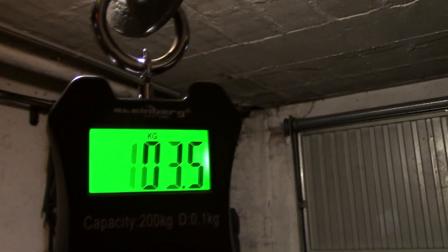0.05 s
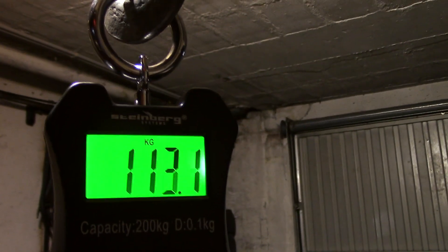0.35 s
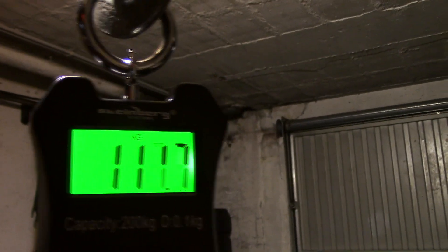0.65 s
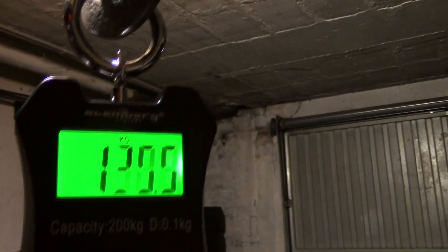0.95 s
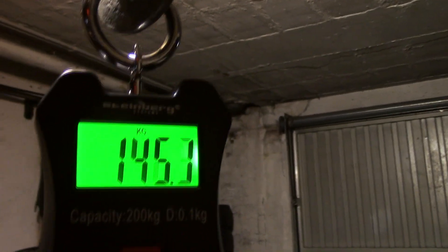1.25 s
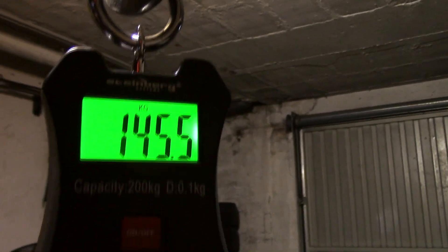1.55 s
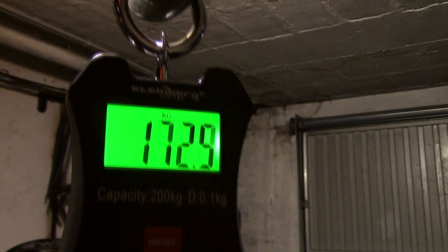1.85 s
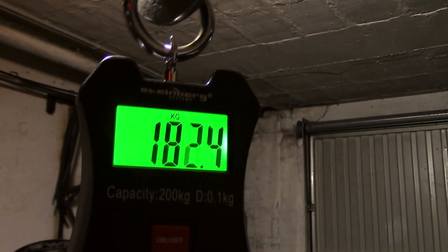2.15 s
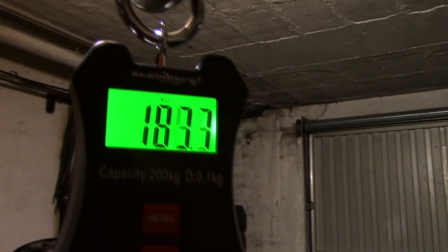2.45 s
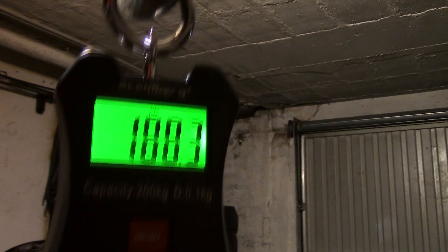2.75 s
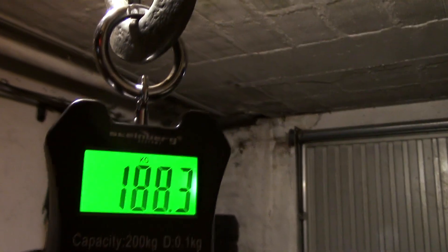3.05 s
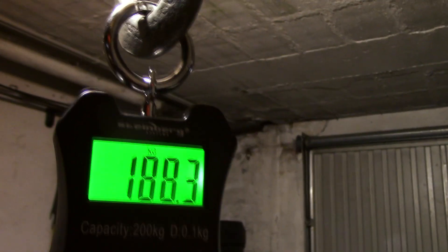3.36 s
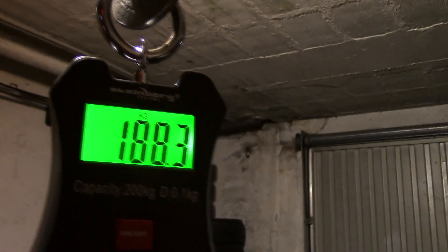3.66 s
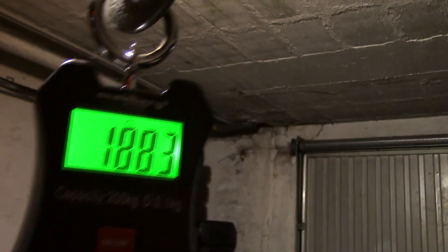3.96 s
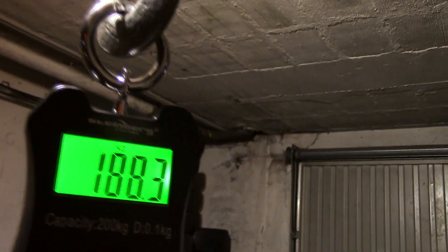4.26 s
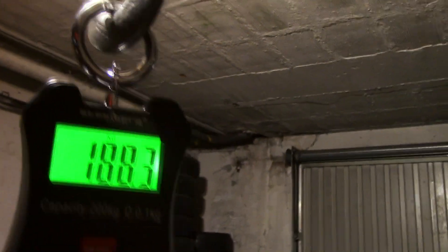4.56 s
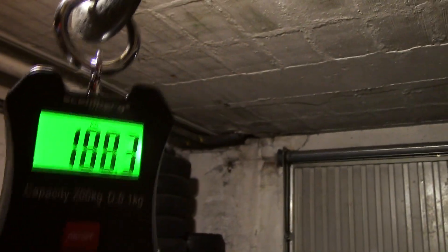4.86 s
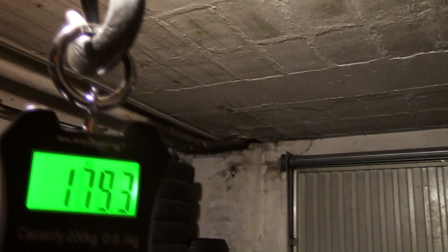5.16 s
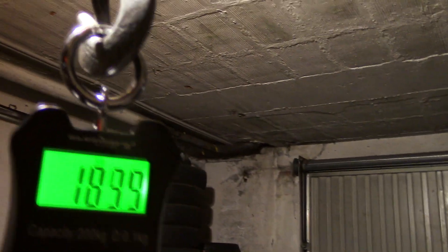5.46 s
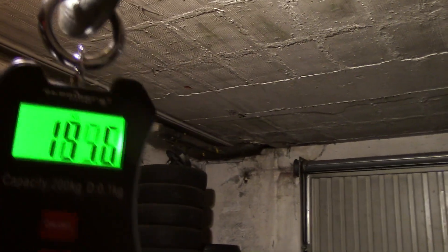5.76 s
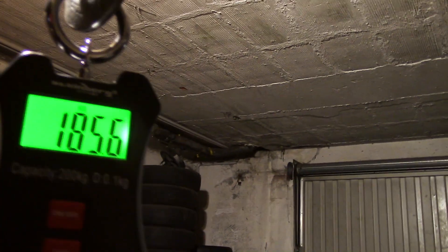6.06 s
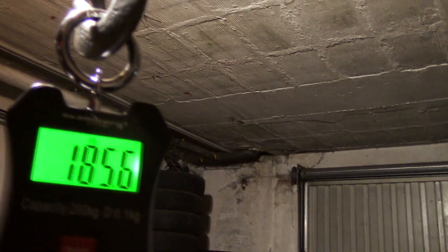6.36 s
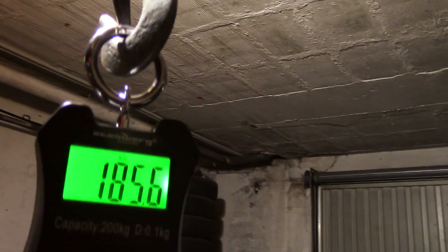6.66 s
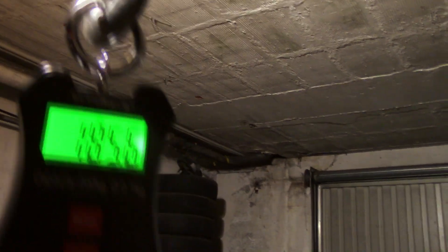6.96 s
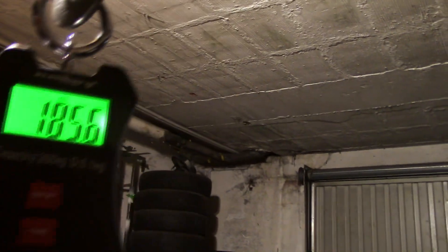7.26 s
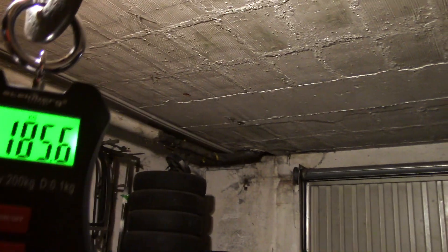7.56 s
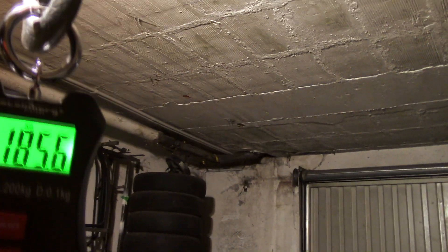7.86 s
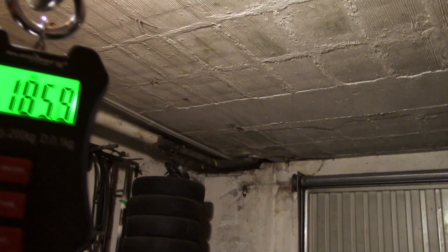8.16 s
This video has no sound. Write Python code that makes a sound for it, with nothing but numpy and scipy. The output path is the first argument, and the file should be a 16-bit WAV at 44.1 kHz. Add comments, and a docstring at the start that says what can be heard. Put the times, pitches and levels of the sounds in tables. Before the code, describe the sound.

A hand-pumped steel hoist is worked across a bare concrete garage, each hit leaving a short echo over quiet room air. The lever snaps through its slack and lands in a ringing, mid-pitched clunk at about 0.6, 1.4, 2.3, 3.4, 4.5, 5.5, 6.8 and 7.8 seconds. Roughly half a second before each clunk, it swings back with a softer click and a brief pivot rattle. Small steel parts chink and loose links clink lightly in between. At 1.9 seconds the whole frame jolts with one heavy clang, among the loudest hits. The strokes at 5.5 and 6.8 seconds rebound into a quick, duller second clunk. A few dry knocks and ticks sound right beside the microphone, faint at first and clearest around 5.4 and 7 seconds. The pumping keeps its pace to the end, at about 8 seconds.

```python
"""Engine hoist in a concrete garage

A hand-pumped hoist lifts an engine across a bare room from the microphone, about a stroke a second.
The lever clicks in its pivot, small steel parts chink, and each stroke ends in a ringing clunk;
once the whole frame jolts. Each blow is a dense clash dying with the room, plus a few ringing modes.
A few dry knocks and ticks sound right beside the microphone, over quiet garage air."""
import sys
import numpy as np
from scipy import signal
from scipy.fft import rfft, irfft, next_fast_len
from scipy.io import wavfile

SR = 44100
rng = np.random.default_rng(int(sys.argv[2]) if len(sys.argv) > 2 else 0)


def output_pcm(signal):
    """Save a mono or channel-first signal as 16-bit PCM at the path in sys.argv[1].

    Samples are clipped to [-1, 1] before scaling.
    """
    pcm = np.clip(np.atleast_2d(signal).T, -1, 1) * 32767
    wavfile.write(sys.argv[1], SR, np.round(pcm).astype(np.int16))


N = 362061
SIZE, LEAD_S = 2 ** 15, .03  # samples in one blow; time ahead of its contact
TOP_HZ = 15700

# reverberation of the garage: pitch_hz, t60_s
GARAGE_DECAY = [(100, 0.57), (170, 1.0), (300, 0.75), (700, 0.6), (1800, 0.59), (4800, 0.5), (8000, 0.39),
                (14000, 0.46)]
# standing waves between hoist and microphone: centre_hz, width_hz, gain_db
STANDING_WAVES = [(178.6, 7.4, 5), (226.4, 16, -9), (242.5, 5.4, 7.5), (318, 11.3, -6), (372, 12, -4),
                  (522, 34, -7), (856, 12.4, -17), (870, 23, 4), (994, 75, -4), (1481, 10, -22.5),
                  (1960, 79, -1.5), (2070, 43, 0.5), (2297, 10, -2), (2770, 10, 0), (3140, 17, -5.5)]
# spectra of the room air and of each kind of contact: pitch_hz, relative_db
AIR_COLOUR = [(12, -25.5), (20, -13.5), (92, -10.5), (225, 0), (306, 2.5), (404, 1), (686, -1), (767, -7),
              (906, -7.5), (1130, -1), (1340, -9.5), (1670, -12.5), (1870, -9.5), (6020, -22.5),
              (15500, -37.5)]
FRAME_COLOUR = [(40, -40), (110, -53), (170, -15), (215, -32), (370, 3.5), (520, -9.5), (1000, 6.5),
                (1600, -4), (2200, 0.5), (3000, -12), (4000, -21.5), (6000, -35), (11000, -48),
                (15500, -67)]
KNOCK_COLOUR = [(80, -5.5), (250, -1), (480, 6), (800, 5.5), (1300, -10), (2400, -8), (3500, -26.5),
                (8000, -63)]
TICK_COLOUR = [(100, -21), (400, 6.5), (900, -18), (1500, 1), (2200, -12), (2700, -18), (3900, -15),
               (5000, -58), (12000, -60)]
LINK_COLOUR = [(80, -49), (250, 5), (1000, 5.5), (2200, 9.5), (3800, 2), (4500, -7), (5200, -3.5),
               (6200, -19), (7000, -11.5), (8000, -36), (9600, -24), (11000, -32), (15000, -65)]
SETTLE_COLOUR = [(80, -34.5), (170, -2), (700, 8), (2000, 8.5), (3500, 2), (5500, -8), (7400, -11.5),
                 (8300, -21.5), (11000, -30), (15000, -45)]
SLIP_COLOUR = [(200, -36), (2500, 17), (5000, 7.5), (7000, 6), (8200, -0.5), (11000, -2), (13000, -18),
               (15500, -20)]
PIVOT_COLOUR = [(60, -28), (130, -31.5), (180, -8.5), (260, 3), (400, 3.5), (520, 7), (750, 4.5),
                (1400, 0.5), (2400, 3), (4200, -8), (6300, -24), (8000, -37.5), (10000, -35.5),
                (15000, -73.5)]
LEVER_COLOUR = [(50, -55.5), (120, -61), (170, -11.5), (215, -14), (260, -1), (540, 2.5), (720, 7),
                (950, 6), (1300, 9), (2400, 1), (3400, -10), (6000, -28.5), (11000, -54.5), (15500, -66.5)]
# ringing modes of the steel parts: pitch_hz, relative_db, t60_s
OPENING_RING = [(764, -52.5, 2.5), (1580, -62, 0.83), (386, -56.5, 0.95)]  # still sounding from an earlier stroke
FRAME_RING = [(173, -14.5, 0.25), (245, -12, 0.61), (311, -7.5, 0.75), (386, 2, 0.29), (478, -10, 0.82),
              (640, -32, 0.86), (736, -16, .6), (931, 1.5, 0.46), (1060, -11, 0.3), (1083, 0.5, 0.22),
              (1233, 1.5, 0.47), (1450, -6.5, 0.56), (1763, -36, 0.15), (1980, -19, 0.22),
              (2040, -14, 0.62), (2130, -10, 0.56), (2140, -5, .49), (2270, -10, 0.33), (2600, -40, .35),
              (2970, -15, .41), (3880, -21, 0.55)]
LINK_RING = [(826, -26, 1), (1160, 3.5, 0.39), (1740, -21, .6), (2160, -33, .5), (2180, 1.5, 0.79),
             (2310, 3.5, 0.6), (2500, -5, 0.29), (3080, 0, 0.43), (3620, -10, .3)]
SETTLE_RING = [(2760, 3, 0.53), (3320, 0, 0.47), (7000, -8.5, 0.45), (7440, -11, .4)]
SLIP_RING = [(4880, 6.5, .4), (5270, 2.5, .35), (6900, -0.5, 0.45), (8720, -6, .35), (9260, -7, 0.38),
             (11100, -16, 0.21)]
WASHER_RING = [(5000, 2, 0.27), (6450, -2, 0.33), (8640, -12, .3), (12317, -18, .3), (12807, -16, .2),
               (13650, -17, 0.23)]
PIVOT_RING = [(255, -8, .6), (384, -9, .55), (760, -7, .55), (800, -5, .6), (1205, -2, .6), (1315, -7, .5),
              (1610, -11, .7), (1820, -8, .55), (2135, -6, .5), (2272, 1, .5), (2363, -2, .5),
              (2560, -7, .45), (3330, -11, .4)]
LEVER_RING = [(271, -23.5, 0.94), (443, -26.5, 0.69), (708.5, -5, 0.17), (765, -12.5, 0.97),
              (801.4, -1, 0.44), (1272, 1.5, 0.25), (1278, -10.5, 0.47), (1407, -14.5, 0.23),
              (1543, -20, 0.81), (1652, -10.5, 1), (1725, -14.5, 0.57), (1810, -35, 0.97),
              (1872, -6.5, 0.64), (1840, -21.5, 0.82), (2240, -18, .5), (2274, -11, 0.54),
              (2380, -13, 0.78), (2440, -14, 0.22), (2530, -10.5, 0.52), (3200, -35, 0.37),
              (3910, -20, 0.37)]
HANDLE_PAIR = [(1210, 0.5, 0.3), (1216, -0.75, 0.53)]  # two notes close in pitch
HANDLE_LONG_RING = [(1582, -18, 0.74), (1815, -12.5, 0.27), (1794, -15, 0.63)]
# the frame never quite stops ringing: pitch_hz, level_db
FRAME_HUM = [(800, -70.5), (1205, -69), (1600, -72.5)]
# high partials of a link's clink: pitch_ratio, relative_db, t60_s
CLINK_PARTIALS = [(.95, 8, 0.17), (0.982, 20, 0.25), (0.998, 11.5, 0.13), (1.038, 4.5, 0.13),
                  (1.37, 4, 0.25), (1.79, 1.5, 0.28), (1.86, -11, 0.22)]

# dull knocks beside the microphone: start_s, level_db, pitch_hz, life_s
CLOSE_KNOCKS = [(1.769, -46.5, 380, 0.0033), (1.81, -35.5, 815, 0.00084), (2.651, -46.5, 373, 0.0062),
                (3.273, -40.5, 453, 0.0019), (4.942, -36.5, 405, .002), (4.967, -37.5, 359, .0018),
                (5.1, -33, 454, .0055), (5.411, -22, 655, 0.0018), (5.429, -20, 636, 0.0033),
                (7.013, -26, 483, 0.0031)]
# dry ticks beside the microphone: start_s, level_db
CLOSE_TICKS = [(2.548, -37), (2.843, -36.5), (3.746, -40.5), (5.201, -36.5), (5.429, -22), (6.945, -29),
               (7.248, -37.5), (7.31, -32.5), (7.387, -31.5)]
# the frame jolts under the load: start_s, level_db
FRAME_JOLTS = [(1.876, -13.5)]
# a loose link drops back: start_s, level_db, clink_hz, clink_db, boom_db
LINK_DROPS = [(0.1863, -38, 5230, -24, -24), (0.6, -33, 4910, -14.5, -2), (4.2441, -36, 4700, -39, -30),
              (6.512, -33.8, 5250, -18, -25), (7.5642, -33, 5254, -14.5, -14)]
# the mechanism settles between strokes, or the pivot gives a soft, duller click: start_s, level_db, treble_db
SETTLINGS = [(0.8342, -47, -0.5), (1.5051, -33, 0.5), (2.9626, -37, 1), (3.049, -42.5, -2.5),
             (3.5677, -38, 0.5), (5.0824, -46.5, -1), (5.2444, -47.5, -3.5), (7.007, -36.5, 0),
             (7.7097, -41, -8.5)]
# the lever swings back: start_s, click_db, rattle_db, washer_db, washer_hz
RETURN_SWINGS = [(0.047, -41, -43.5, -71, 6500), (1.0155, -39.5, -33.5, -61, 6200),
                 (1.854, -38, -31, -61, 6500), (2.848, -36, -38.5, -67, 6300),
                 (4.0117, -36, -36, -55.5, 6800), (4.996, -39.5, -35, -73, 7100),
                 (6.2391, -37.5, -39, -60, 8700), (7.3583, -38.5, -36.5, -58, 8700)]
# contacts in the pivot after that click: delay_s, relative_db
PIVOT_RATTLE = [(0.03, -4.5), (.07, -0.5), (.104, -4.5)]
# the lever is pushed to its stop:
# stop_s, level_db, rise_s, slack_s, take_up_db, bass_db, treble_db, sing_db
PUSH_STROKES = [(0.57, -24.5, .0033, .036, -48, 5.5, 1, 3.5),
                (1.425, -16.5, 0.0038, .033, -33, -1.5, 3.5, -13),
                (2.344, -19.5, .0044, 0.046, -37.5, 0, 0.1, 5),
                (3.371, -20.5, 0.0039, 0.052, -38.5, -1.5, -2.5, 3.5),
                (4.504, -18, .0047, 0.046, -36, 2.5, 0, 6), (5.479, -20.5, 0.0032, .051, -39.5, -4, 2, 4.5),
                (6.794, -23, 0.0091, 0.054, -41.5, 3, 5, 2),
                (7.849, -20.5, 0.0051, 0.037, -39, 3.5, 1.9, -16)]
# steel slips as the slack closes: share_of_slack, relative_db (to the take-up)
SLACK_SLIPS = [(0.059, -16), (.45, -10.5), (0.951, -15)]
# the lever bounces and meets the stop again: start_s, level_db, sing_db
STOP_REBOUNDS = [(5.569, -25.5, 7), (6.876, -27, 6.5)]


def amp(db):
    """Decibels to gain."""
    return 10 ** (np.asarray(db) / 20)


def unit(x):
    """Scale to rms 1."""
    return x / np.sqrt(np.mean(x ** 2) + 1e-20)


def along(points, hz):
    """Read a curve of (pitch_hz, value) points on a log frequency axis."""
    pitches, values = np.transpose(points)
    return np.interp(np.log(hz + 1), np.log(pitches + 1), values)


def noise(colour, size):
    """Coloured noise of rms 1."""
    hz = np.fft.rfftfreq(size, 1 / SR)
    return unit(irfft(rfft(rng.standard_normal(size)) * amp(along(colour, hz)), size))


def wobble(rate_hz, size):
    """A random curve gliding through rate_hz knots a second."""
    knots = rng.standard_normal(size // 50)
    return np.interp(np.arange(size) * rate_hz / SR, np.arange(len(knots)), knots)


def add(track, contact_s, sound):
    """Mix in a sound from LEAD_S ahead of its contact, at the earliest from time zero."""
    start = max(round((contact_s - LEAD_S) * SR), 0)
    track[start:start + SIZE] += sound[:N - start]


def tinted(sound, bass_db, treble_db):
    """Tilt the lows and the highs of a sound around its middle."""
    tilt = [(400, bass_db), (900, 0), (1500, 0), (3200, treble_db)]
    return irfft(rfft(sound) * amp(along(tilt, np.fft.rfftfreq(SIZE, 1 / SR))))


def standing_waves(hz):
    """Gain at the microphone, where standing waves lift or cancel narrow bands."""
    return amp(sum(db * np.exp(-((hz - centre) / width) ** 2 / 2) for centre, width, db in STANDING_WAVES))


def clash(colour, scatter_db=3):
    """Countless small modes, some stronger than others at each blow, dying away with the garage."""
    hz = np.fft.rfftfreq(SIZE, 1 / SR)
    centres_hz = np.arange(0, SR / 2, 45)
    scatter = np.interp(hz, centres_hz, rng.standard_normal(len(centres_hz))) * hz / (hz + 1200)
    spectrum = rfft(noise(colour, SIZE)) * standing_waves(hz) * amp(scatter_db * scatter)
    bands_hz, times_s, bands = signal.stft(unit(irfft(spectrum)), SR, nperseg=512)
    decay = amp(-60 * np.maximum(times_s - LEAD_S, 0) / along(GARAGE_DECAY, bands_hz)[:, None])
    return signal.istft(bands * decay, SR, nperseg=512)[1][:SIZE]


def ringing(modes):
    """Fading modes; reflections make each drift in phase and strength, the high ones faster."""
    t = np.arange(SIZE) / SR - LEAD_S
    out = np.zeros(SIZE)
    for hz, db, t60_s in modes:
        drift_hz = 35 + hz / 90
        phase = 2 * np.pi * (hz * t + rng.random()) + .7 * wobble(drift_hz, SIZE)
        level_db = db + 1.5 * rng.standard_normal() + 2 * wobble(drift_hz, SIZE)
        out += amp(level_db - 60 * np.maximum(t, 0) / t60_s) * np.sin(phase)
    return out


def strike(colour, modes=(), ring_db=0, rise_s=.00095, early_db=-20, early_s=.089, chatter_db=-1):
    """One blow on steel heard across the garage: a dense clash and a few ringing modes."""
    t = np.arange(SIZE) / SR - LEAD_S
    age = np.maximum(t, 0)
    chatter = amp(chatter_db * wobble(180, SIZE) * np.exp(-age / .12))  # loose faces rattle, then settle
    attack = (1 + np.tanh(t / rise_s / 2)) / 2
    early = 1 + amp(early_db) * np.exp(-age / early_s)  # direct sound and the nearest walls
    steel = chatter * clash(colour) + amp(ring_db) * ringing(modes)
    return attack * early * steel / (1 + amp(early_db))


def background():
    """Room tone: quiet garage air and the faint lingering ring of the loaded frame."""
    t = np.arange(N) / SR
    air = amp(-59 + .71 * wobble(3.93, N)) * noise(AIR_COLOUR, N)
    hum = sum(amp(db + 4.2 * wobble(5.8, N)) * np.sin(2 * np.pi * hz * t + wobble(30, N))
              for hz, db in FRAME_HUM)
    return air + hum


def tap(colour, pitch_hz, tone_db, life_s, room_db):
    """A close, damped contact: a few cycles and a faint answer from the room."""
    age = np.maximum(np.arange(SIZE) / SR - LEAD_S, 0)
    body = noise(colour, SIZE) + amp(tone_db) * np.sin(2 * np.pi * pitch_hz * age)
    swell = age / life_s * np.exp(1 - age / life_s)
    low_cut = signal.butter(3, 260, "highpass", fs=SR, output="sos")  # a small part radiates no bass
    return signal.sosfilt(low_cut, swell * body + amp(room_db) * strike(colour))


def close_taps():
    """Dull knocks and dry ticks next to the microphone."""
    out = np.zeros(N)
    for start_s, db, pitch_hz, life_s in CLOSE_KNOCKS:
        knock = tap(KNOCK_COLOUR, pitch_hz, tone_db=1, life_s=max(life_s, .001), room_db=-7)
        add(out, start_s, amp(db) * knock)
    for start_s, db in CLOSE_TICKS:
        tick = tap(TICK_COLOUR, pitch_hz=1540, tone_db=4, life_s=.00075, room_db=-37)
        add(out, start_s, amp(db) * tick)
    return out


def chink():
    """Steel slips on steel, bright and chattering."""
    return strike(SLIP_COLOUR, SLIP_RING, ring_db=-12, rise_s=.0013,
                  early_db=-3.5, early_s=.044, chatter_db=4.5)


def small_parts(boom_hz=171, boom_t60_s=1.3):
    """A dropping link clinks and wakes a low boom in the frame; between strokes the mechanism settles or the
    pivot clicks softly."""
    out = np.zeros(N)
    for start_s, db, clink_hz, clink_db, boom_db in LINK_DROPS:
        clink = [(ratio * clink_hz, level + clink_db, t60) for ratio, level, t60 in CLINK_PARTIALS]
        modes = LINK_RING + clink + [(boom_hz, boom_db, boom_t60_s)]
        drop = strike(LINK_COLOUR, modes, ring_db=-11, rise_s=.0002, early_db=-9.5, early_s=.005)
        add(out, start_s, amp(db) * drop)
    for start_s, db, treble_db in SETTLINGS:
        shift = strike(SETTLE_COLOUR, SETTLE_RING, ring_db=-13, rise_s=.0017)
        add(out, start_s, amp(db) * tinted(shift, bass_db=0, treble_db=treble_db))
    return out


def frame():
    """The frame is still ringing at first; later a slip sets off one heavy jolt of its deeper modes."""
    out = np.zeros(N)
    add(out, 0, ringing(OPENING_RING))
    for start_s, db in FRAME_JOLTS:
        add(out, start_s - .016, amp(db - 30.5) * chink())
        jolt = strike(FRAME_COLOUR, FRAME_RING, ring_db=-3, rise_s=.0014, early_db=-5, early_s=.099)
        add(out, start_s, amp(db) * jolt)
    return out


def click(rise_s):
    """Play in the pivot is taken up; a slow rise makes it a short scrape."""
    return strike(PIVOT_COLOUR, PIVOT_RING, ring_db=-6, rise_s=rise_s)


def lever_returns(scatter_s=.004, washer_delay_s=.061, slip_delay_s=.081):
    """Each swing back starts with a click; the pivot rattles, a washer tips over and steel slips."""
    out = np.zeros(N)
    for start_s, click_db, rattle_db, washer_db, washer_hz in RETURN_SWINGS:
        add(out, start_s, amp(click_db) * click(rise_s=.00067))
        for delay_s, db in PIVOT_RATTLE:
            contact = tinted(click(rise_s=.0016), bass_db=1, treble_db=-2.5)
            add(out, start_s + delay_s + scatter_s * rng.standard_normal(), amp(rattle_db + db) * contact)
        modes = WASHER_RING + [(washer_hz, -2, .35)]
        washer = strike(SLIP_COLOUR, modes, ring_db=1, rise_s=.0008, chatter_db=8.5)
        add(out, start_s + washer_delay_s, amp(washer_db) * washer)
        add(out, start_s + slip_delay_s, amp(rattle_db - 16) * chink())
    return out


def clunk(rise_s, sing_db, long_ring_db=4):
    """The lever meets its stop; where the blow lands decides how much the handle sings."""
    pair = [(hz, db + sing_db, t60) for hz, db, t60 in HANDLE_PAIR]
    linger = [(hz, db + sing_db + long_ring_db, t60) for hz, db, t60 in HANDLE_LONG_RING]
    modes = LEVER_RING + pair + linger
    return strike(LEVER_COLOUR, modes, ring_db=-4, rise_s=rise_s, early_db=-5, early_s=.15)


def lever_pushes():
    """Each push snaps into the slack, slips along it and clunks on the stop; two rebound, duller."""
    out = np.zeros(N)
    for stop_s, db, rise_s, slack_s, take_up_db, bass_db, treble_db, sing_db in PUSH_STROKES:
        start_s = stop_s - slack_s
        snap = tinted(click(rise_s=.0014), bass_db=.5, treble_db=3.5)
        add(out, start_s, amp(take_up_db) * snap)
        for share, slip_db in SLACK_SLIPS:
            add(out, start_s + share * slack_s, amp(take_up_db + slip_db) * chink())
        add(out, stop_s, amp(db) * tinted(clunk(rise_s, sing_db), bass_db, treble_db))
    for start_s, db, sing_db in STOP_REBOUNDS:
        rebound = tinted(clunk(rise_s=.0031, sing_db=sing_db), bass_db=-.5, treble_db=-6.5)
        add(out, start_s, amp(db) * rebound)
    return out


def scene():
    """The hoist across the garage, the close taps and the room tone, at one microphone."""
    hoist = lever_pushes() + lever_returns() + frame() + small_parts()
    return (hoist + close_taps() + background())[None]


def record(dry):
    """The camera's microphone keeps nothing above TOP_HZ."""
    size = next_fast_len(N + SR)
    passband = np.fft.rfftfreq(size, 1 / SR) < TOP_HZ
    return irfft(rfft(dry, size) * passband, size)[..., :N]


dry = scene()
out = record(dry)
output_pcm(out)
```